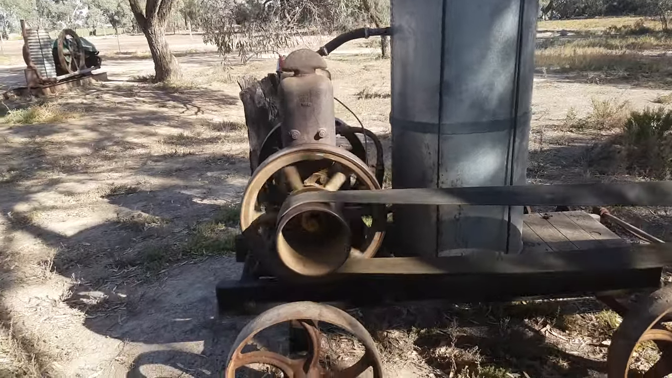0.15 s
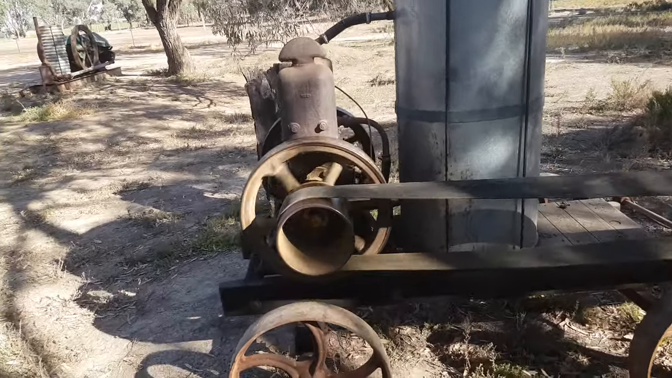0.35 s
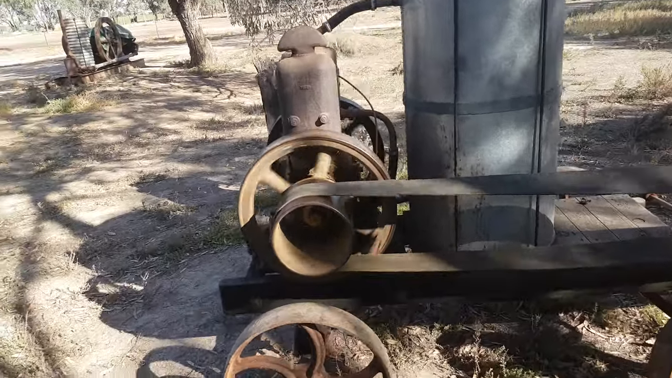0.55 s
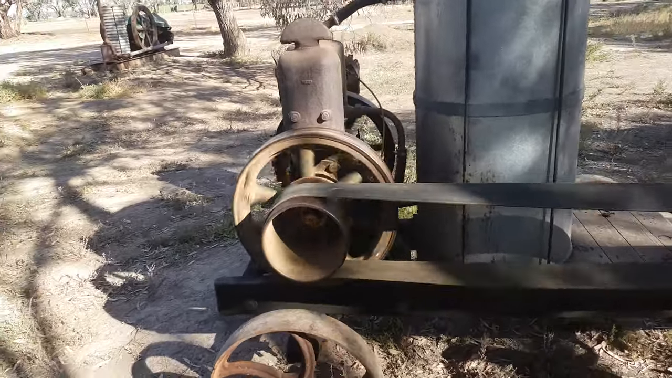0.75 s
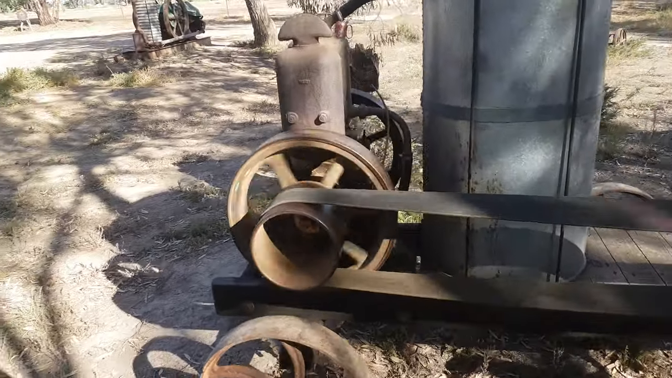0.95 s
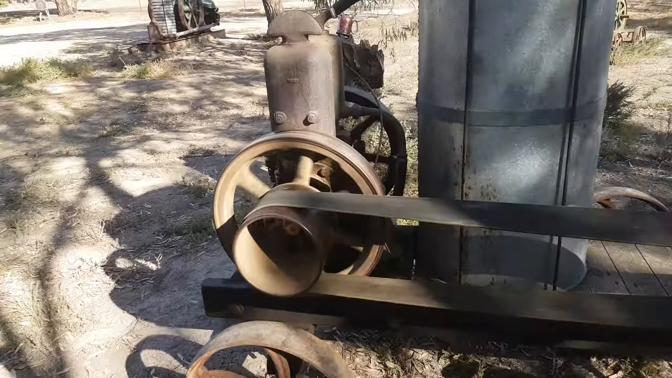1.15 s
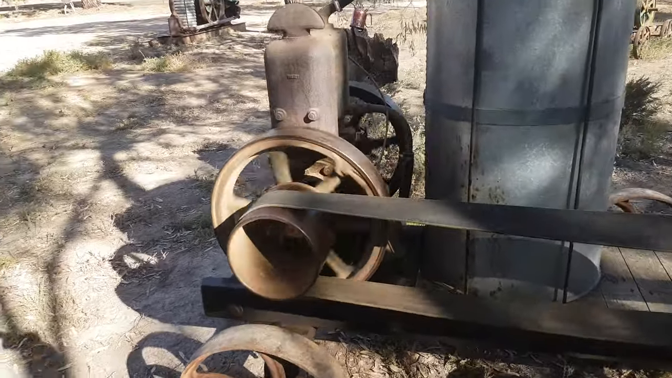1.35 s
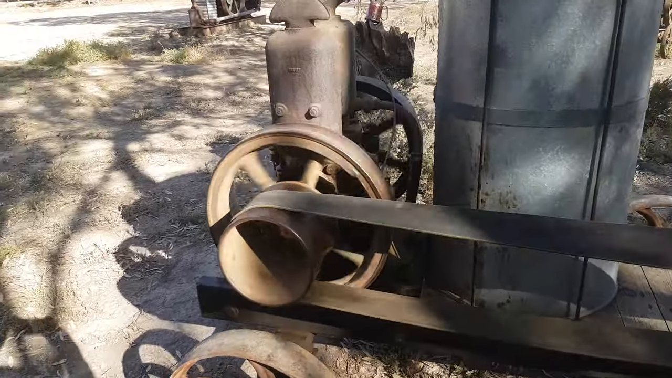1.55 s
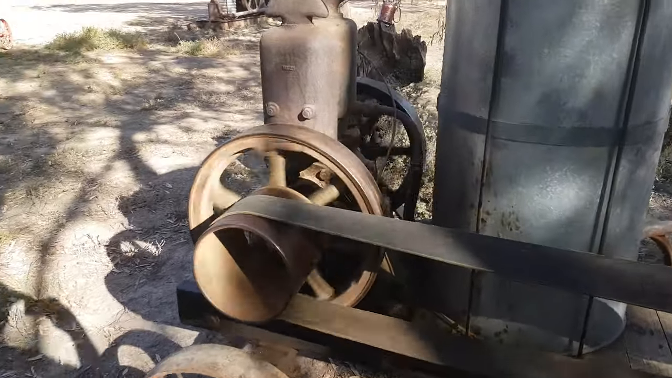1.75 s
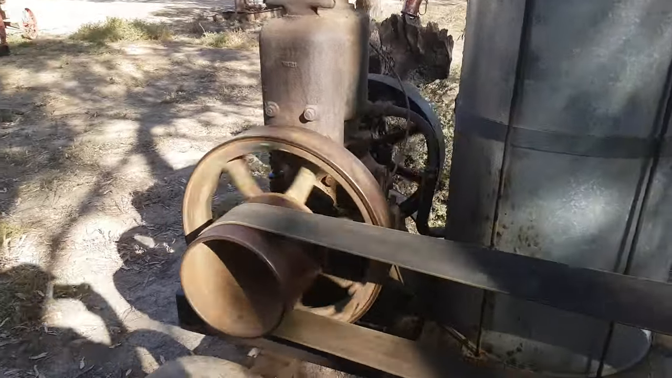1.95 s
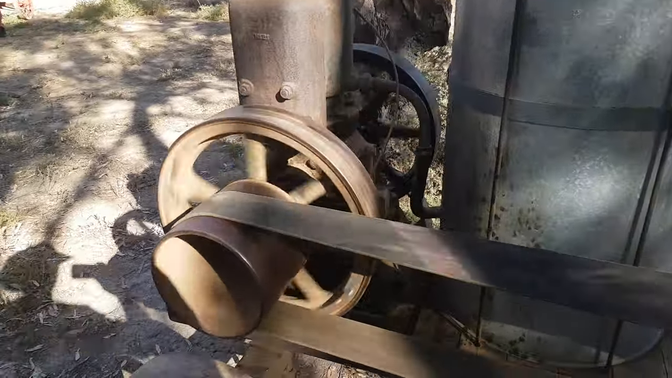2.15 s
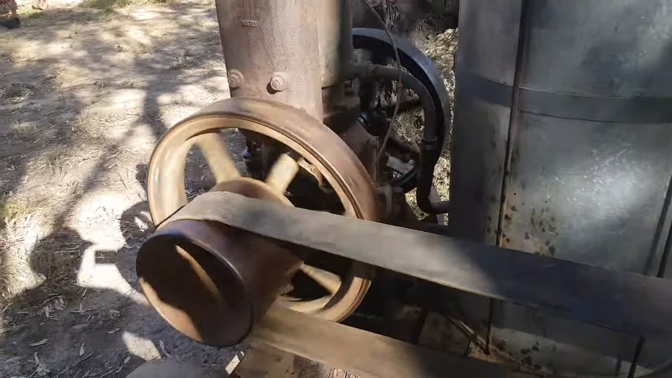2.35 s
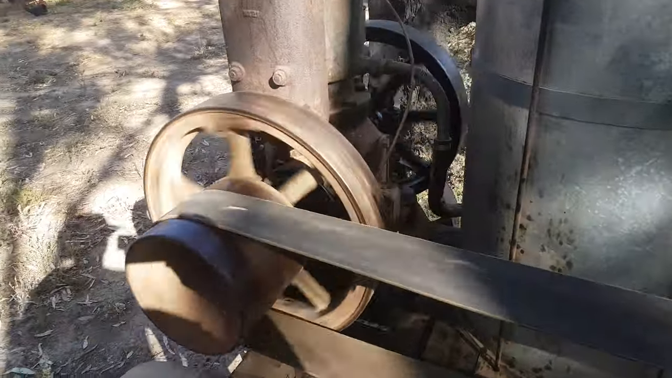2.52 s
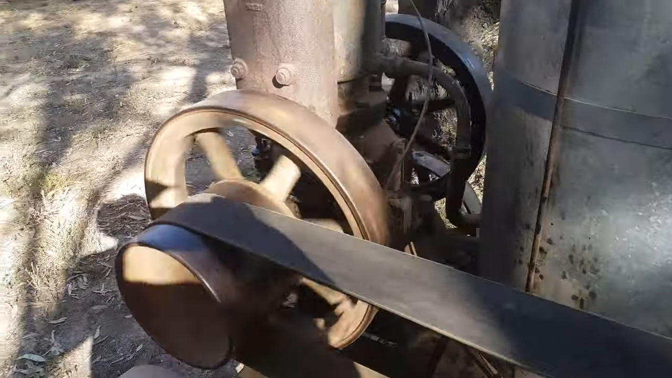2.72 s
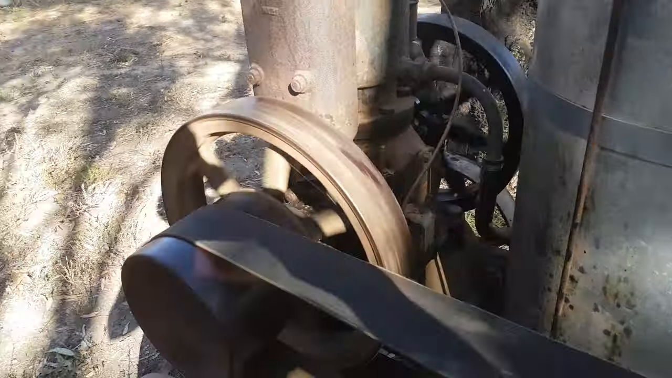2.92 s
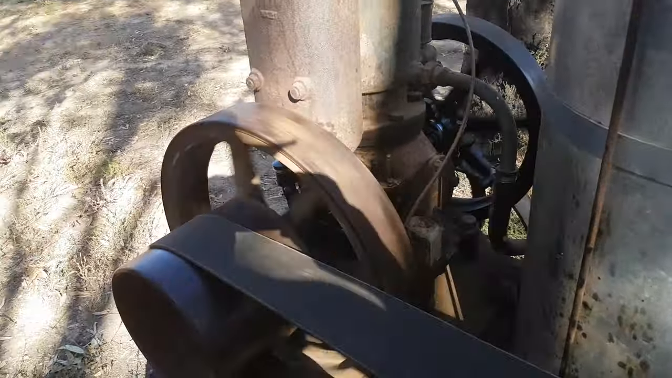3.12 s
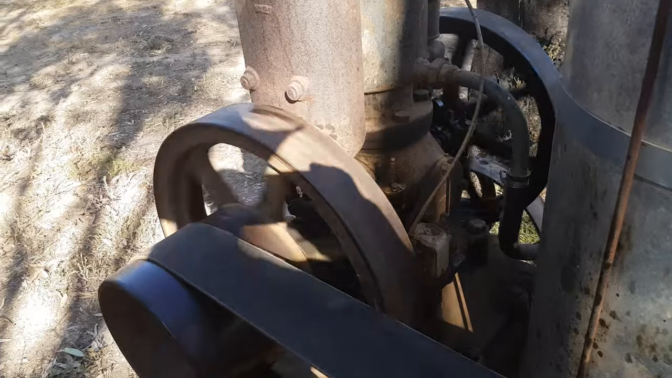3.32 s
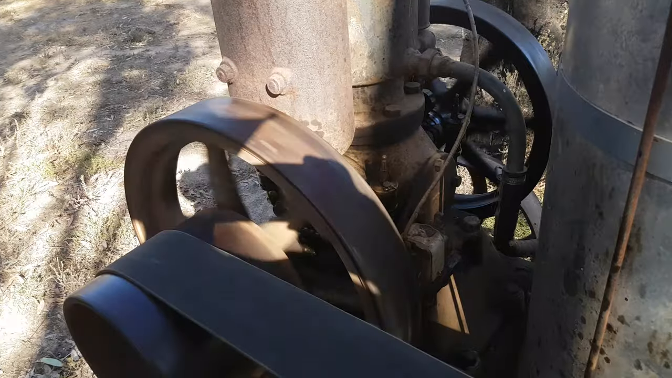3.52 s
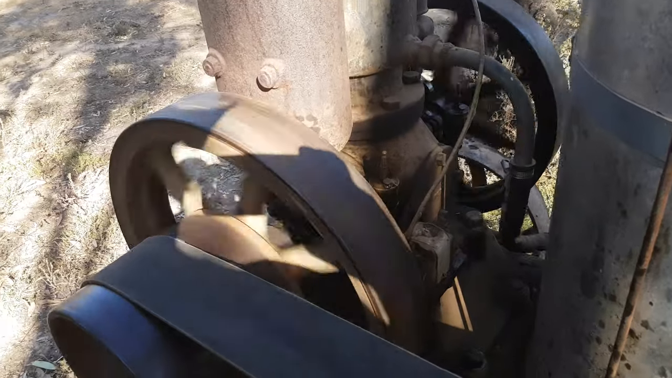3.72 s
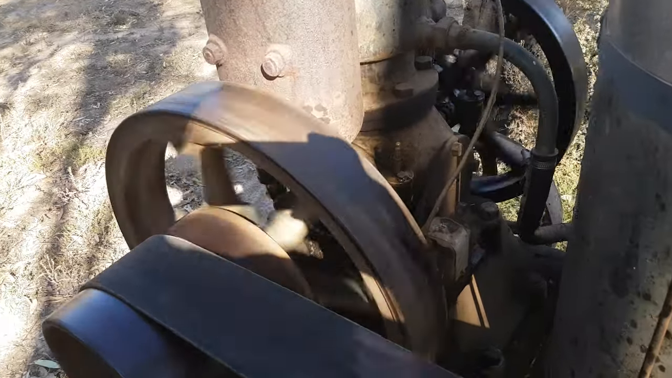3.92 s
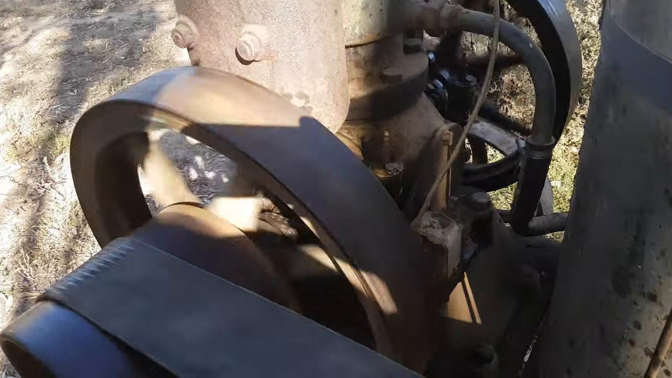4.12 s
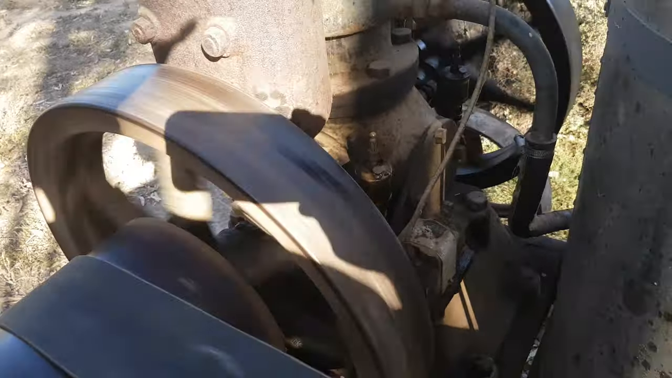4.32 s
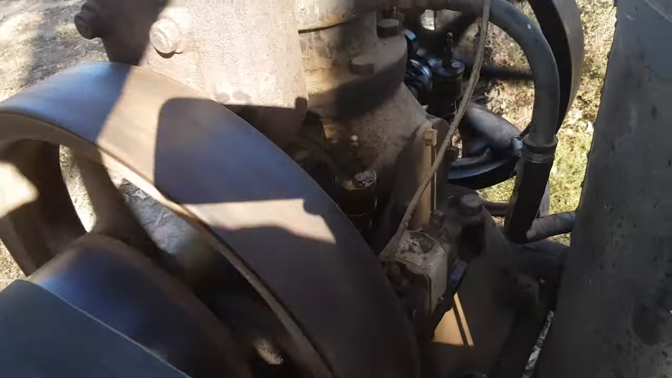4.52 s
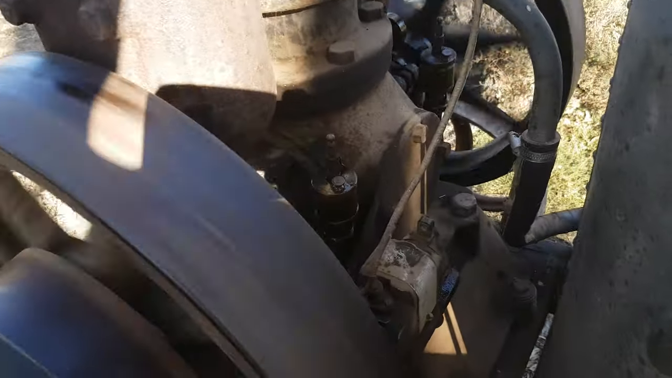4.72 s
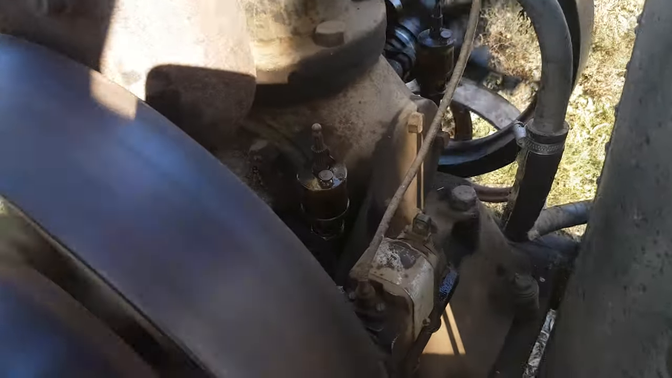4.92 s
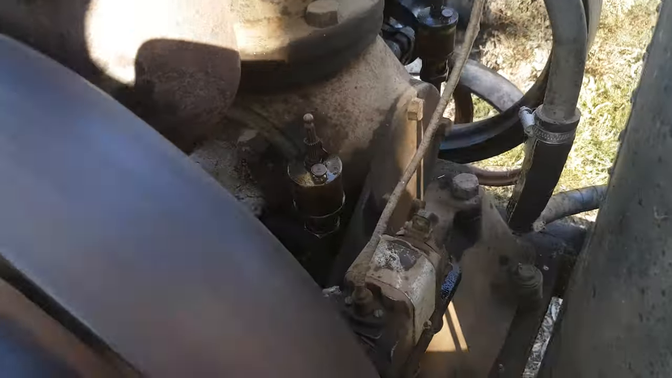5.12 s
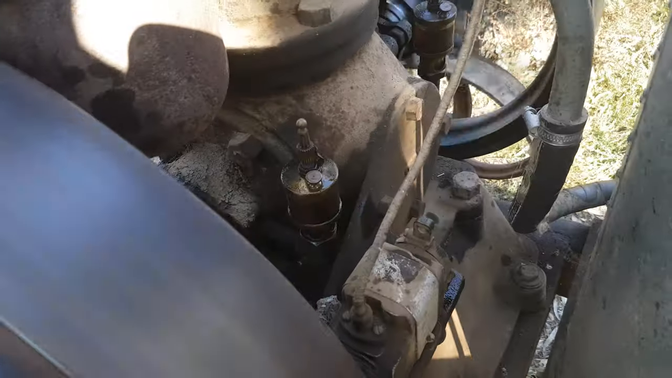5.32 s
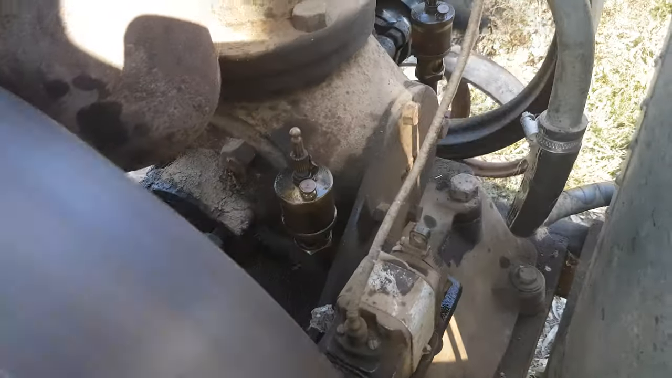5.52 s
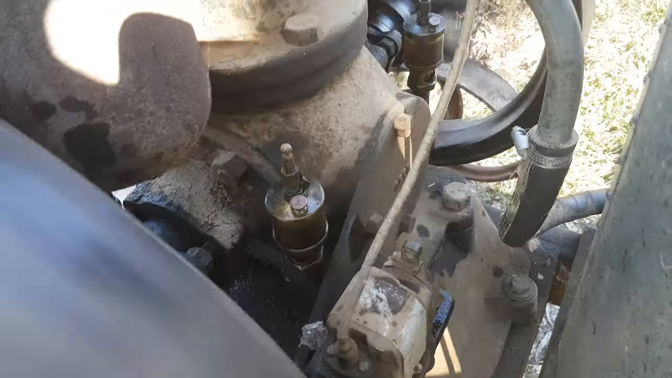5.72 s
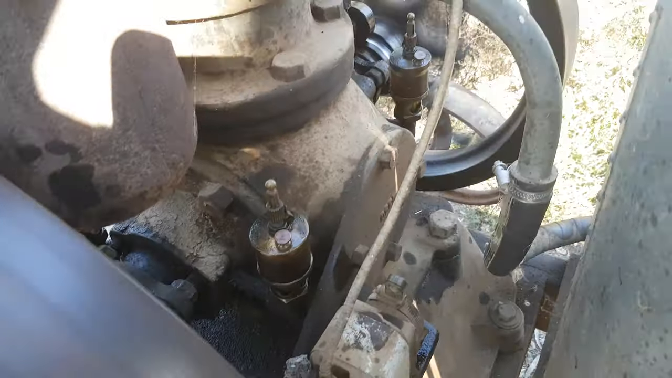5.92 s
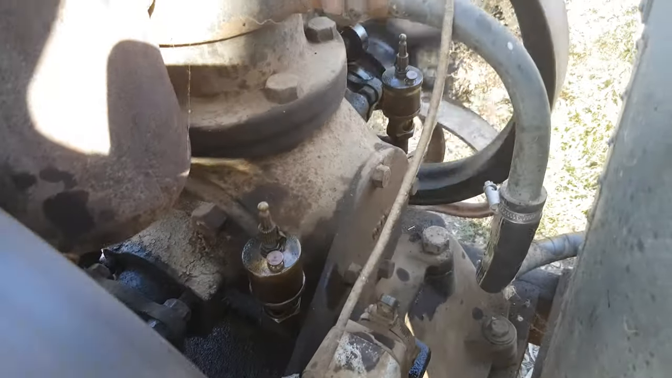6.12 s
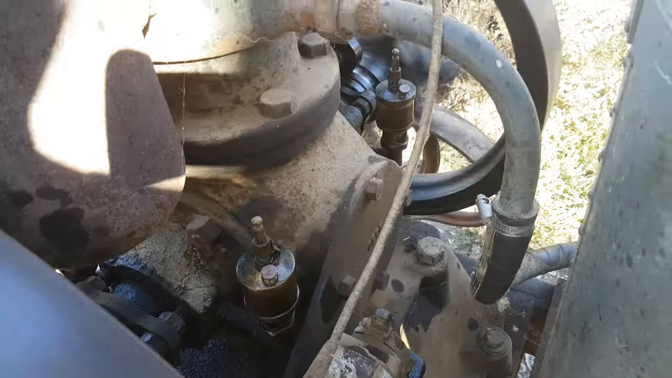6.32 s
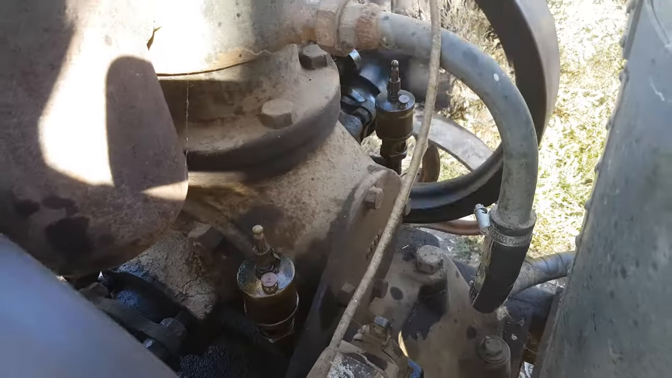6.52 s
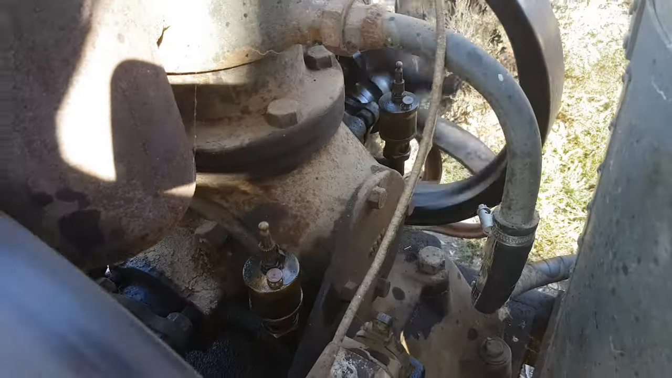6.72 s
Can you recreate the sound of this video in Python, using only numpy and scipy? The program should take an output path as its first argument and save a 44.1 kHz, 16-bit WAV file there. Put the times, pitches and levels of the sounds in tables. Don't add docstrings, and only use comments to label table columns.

```python
import sys
import numpy as np
from scipy import signal
from scipy.fft import rfft, irfft, next_fast_len
from scipy.io import wavfile
from scipy.ndimage import uniform_filter1d

SR = 44100
rng = np.random.default_rng(int(sys.argv[2]) if len(sys.argv) > 2 else 0)


def output_pcm(signal):
    pcm = np.clip(np.atleast_2d(signal).T, -1, 1) * 32767
    wavfile.write(sys.argv[1], SR, np.round(pcm).astype(np.int16))


def undo_db(level):
    steps = np.asarray(level, float) / 20
    return 10 ** steps


N = 298116
SIZE = next_fast_len(N + SR // 2)
HZ = np.arange(1, SIZE // 2 + 2) * SR / SIZE
CLOSENESS, LEFT_LEAD, VALVE_DB, RUNNING_DB = 1, 2, 3, 4

# time in seconds, level in dB.
CATCHES = [
    (2.325, -20.5),
    (4.1071, -22.5),
    (6.518, -21),
]


def along(column, seconds=np.arange(N) / SR):
    # time in seconds, closeness from 0 to 1, lead of the left port in samples,
    # valve gear level in dB, running gear level in dB.
    walk = [(0, 0, 0.88, -16.5, 0.5), (.5, 0, 1.8, -8, 0.3), (1.2, 0.12, 2.34, -5, 1),
            (1.9, 0.21, 2.6, -4.1, 4), (2.4, 0.43, 2.7, -1, 3.5), (2.9, 0.49, 3.05, -1.5, 5.5),
            (3.3, 0.59, 2.9, 1.5, 6), (3.7, 0.7, 3.8, -0.1, 5.5), (4.4, 0.93, 5.23, -2.5, -0.5),
            (5.0, 0.95, 11.9, -0.1, 4.5), (5.8, 0.97, 12.8, -0.7, 1.6), (6.3, 0.98, 14.4, -2, 0.3),
            (6.76, 0.93, 13.8, -1, 1.5)]
    return np.interp(seconds, np.array(walk)[:, 0], np.array(walk)[:, column])


def turns():
    # time in seconds, turns made.
    flywheel = [(.0676, 0), (.5889, 4), (1.1019, 8), (1.7384, 13), (2.2426, 17), (2.3701, 18), (2.7579, 21),
                (3.2681, 25), (3.6475, 28), (4.0251, 31), (4.1528, 32), (4.5396, 35), (4.7956, 37),
                (5.4314, 42), (5.8101, 45), (6.4365, 50), (6.6901, 52)]
    # closeness from 0 to 1, then levels in dB of
    heard_parts = [(0, -12.5, -14, -10.5, -21, -34), (.12, -12.5, -11, -13, -15.5, -36),
                   (.3, -10, -15, -7.5, -27, -34), (.46, -9, -16, -10, -11.5, -27),
                   (.52, -9.5, -13, -14, -18, -30.5), (.6, -6.5, -13, -10.5, -19, -31.5),
                   (.72, -3, -18.5, -11.5, -39.5, -27), (.9, -3.5, -18, -16.5, -22, -33.5),
                   (1, -4, -25, -29.5, -45, -27)]
    catching_db = [-0.4, .4, -11.5, 9.5, 8]
    missed_db = [-1.2, -11.5, -10, -5, -2]
    rich_db = [-1, 2, -1, 0.5, 1.5]
    # time in seconds, change in dB.
    odd_rings = [(.07, -13.5), (.2, -8.5), (.33, 2), (.46, -5), (.97, -8), (1.23, 6.5), (1.48, -13),
                 (3.27, 5.5), (3.4, -9), (4.67, 2.5), (4.92, -15), (5.3, 10), (5.94, 10), (6.19, -8),
                 (6.31, 12)]
    # time in seconds, change in dB.
    odd_rods = [(.33, -1.5), (.46, 5.5), (.72, 4), (1.1, 2), (1.23, -7), (1.48, -7), (2.76, -1), (2.89, 4),
                (3.01, 5), (3.14, -4.5), (3.77, 18), (3.9, 5), (4.67, 6), (5.05, 3), (5.43, 4), (5.56, -3)]

    when, made = np.transpose(flywheel)
    s = np.interp(np.arange(made[-1] + 1), made, when)
    s = np.r_[2 * s[0] - s[1], s]
    near = along(CLOSENESS, s)
    law = np.transpose(heard_parts)
    db = np.array([np.interp(near, law[0], column) for column in law[1:]])
    missed = np.searchsorted(s, np.transpose(CATCHES)[0])
    for step, change_db in enumerate((catching_db, missed_db, rich_db)):
        db[:, missed + step - 1] += np.array(change_db)[:, None]
    for row, odd in ((2, odd_rings), (3, odd_rods)):
        for at, change_db in odd:
            db[row, np.abs(s - at).argmin()] += change_db
    return s, db


def spikes(seconds, height):
    out = np.zeros(N)
    at = np.round(seconds * SR).astype(int)
    inside = (at >= 0) & (at < N)
    out[at[inside]] = height[inside]
    return out


def strikes(seconds, db, scatter_db, jitter_ms=.4):
    late, strong = np.clip(rng.standard_normal((len(seconds), 2)).T, -1.6, 1.6)
    return spikes(seconds + jitter_ms * late / 1000, undo_db(db + scatter_db * strong))


def blows(seconds, db, rise_ms, fall_ms, scatter_db):
    ms = np.arange(SR // 8) * 1000 / SR
    shape = (1 - np.exp(-ms / rise_ms)) * np.exp(-ms / fall_ms)
    return signal.oaconvolve(strikes(seconds, db, scatter_db), shape / shape.max())[:N]


def part(push, modes, far_pan_db, close_pan_db, alike, strike=0, order=1):
    noise = rng.standard_normal((2, N)) * push
    mid, side = rfft(noise + np.array([[1], [0]]) * strike, SIZE)
    apart = (1 - alike) * np.clip(HZ / 1500, 0, 1) / 2
    wave = np.sqrt(1 - apart) * mid + np.sqrt(apart) * side * np.array([[1], [-1]])
    far, close = 0, 0
    for k, (hz, width, far_db, close_db) in enumerate(modes):
        detuning = (HZ / hz - hz / HZ) * (hz / width)
        ring = (-1) ** k * np.sqrt(SR / np.pi / width) / (1 + 1j * detuning) ** order
        far = far + undo_db(far_db) * ring
        close = close + undo_db(close_db) * ring
    half = np.array([[.5], [-.5]])
    return np.array([wave * far * undo_db(far_pan_db * half), wave * close * undo_db(close_pan_db * half)])


def running_gear(s):
    # centre in Hz, width in Hz, level far in
    # dB, level close in dB.
    running_modes = [(70, 30, -57, -46), (150, 60, -49, -47), (300, 100, -43, -45),
                     (410, 163, -46.5, -41.5), (670, 480, -48, -50), (1285, 145, -46, -48.5),
              (1670, 230, -47, -49.5), (1930, 480, -46.5, -49.5), (3070, 1360, -48.5, -48.5),
              (3800, 800, -48.5, -50), (5400, 1150, -51.5, -54.5), (10900, 2600, -49.5, -56.5),
              (13300, 9000, -53, -70)]
    grain_db = 3 * np.clip(rng.exponential(size=N // 64 + 1), 0, 3) - 4
    grit = uniform_filter1d(undo_db(np.repeat(grain_db, 64)[:N]), size=90)
    swell = 1.79 + blows(s - .005, -0.32, rise_ms=0.82, fall_ms=10.4, scatter_db=2.5)
    return part(undo_db(along(RUNNING_DB)) * grit * swell, running_modes, 0.015, -0.058, alike=0.3)


def loose_parts(s, count=7):
    after = rng.uniform(0, 0.072, (len(s), count))
    at = (s[:, None] + after).ravel()
    db = along(VALVE_DB, at) - 60 * after.ravel()
    return strikes(at, db - 6.0, scatter_db=2.5) * rng.choice([-1, 1], N)


def valve_gear(s):
    # time after the thump in ms, level in dB.
    tap_times = [
        (35.5, 1.5),
        (47, -4.5),
        (60, -7),
    ]
    # centre in Hz, width in Hz, level far in dB, level close in dB.
    squeak_modes = [(3870, 630, -22, -25.5), (5900, 2200, -32, -47), (10500, 1900, -37, -41)]
    # centre in Hz, width in Hz, level far in dB, level close in dB.
    knock_modes = [(1345, 140, -19, -39), (2530, 1660, -21.5, -35), (4150, 700, -26.5, -34.5),
                   (5230, 500, -33, -59), (11500, 4000, -69, -47), (820, 630, -22.5, -49)]
    # centre in Hz, width in Hz, level far in dB, level close in dB.
    tappet_modes = [(3540, 1140, -20, -23.5), (5700, 1460, -24.5, -30), (1530, 580, -17.5, -27.5),
                    (2460, 2800, -21, -24), (10770, 2600, -27.5, -30), (870, 900, -25.5, -59.5)]
    # centre in Hz, width in Hz, level far in dB, level close in dB.
    iron_modes = [(956, 127, -28.5, -24.5), (1650, 46, -63, -29.5), (1968, 83, -28, -29),
                  (3154, 38, -42, -52), (3767, 180, -21.5, -27), (4753, 52, -21, -35),
                  (5470, 140, -23, -36), (6090, 370, -53, -33.5), (361, 120, -17.5, -30),
                  (384, 115, -32, -28.5)]

    db = along(VALVE_DB, s)
    early = s - np.interp(s, [.5, 3.7], [.0188, .016])
    rub = blows(early, db / 2, rise_ms=.4, fall_ms=5.5, scatter_db=.8)
    chirp = strikes(early + 0.00087, db, scatter_db=2.5)
    squeak = part(rub, squeak_modes, -2.0, -10.5, alike=0.21, strike=chirp, order=2)

    knock = blows(s + 0.0098, db, rise_ms=6.1, fall_ms=6.66, scatter_db=2.5)
    taps, ticks = 0, 0
    for ms, tap_db in tap_times:
        at = s + ms / 1000
        taps = taps + blows(at, db + tap_db, rise_ms=1.0, fall_ms=5.6, scatter_db=0.3)
        ticks = ticks + strikes(at + 0.00094, db + tap_db + 8.0, scatter_db=0)
    blow = strikes(s + .013, db + 12, scatter_db=2.5)
    blow = blow + strikes(s - .003, db + 20.5, scatter_db=0)
    blow = blow + strikes(s + 0.011, db - 18, scatter_db=0, jitter_ms=1.6)
    shock = blow + loose_parts(s)
    iron = part(0.55 * knock + 0.24 * taps, iron_modes, 0.3, -2.2, alike=0.09, strike=shock)
    clatter = part(knock, knock_modes, -0.58, -15.5, alike=1.0)
    clatter = clatter + part(taps, tappet_modes, -0.19, -1.8, alike=0.1, strike=ticks)
    return squeak + iron + clatter


def tank(s):
    # centre in Hz, width in Hz, level far in dB, level close in dB.
    tank_modes = [(743.5, 12.5, 5.5, -4.5), (667, 14, -21, -28)]
    # start in seconds, end in seconds, level in dB.
    hum_spells = [(-.1, .26, -34.5), (.4, .78, -41), (.8, 1.55, -33), (1.57, 1.92, -38),
                  (1.94, 2.42, -29.5), (2.7, 3.07, -33), (4.6, 4.98, -30.5), (5.0, 5.5, -34),
                  (6.0, 6.12, -24.5), (6.14, 6.37, -33.5), (6.39, 6.76, -26)]
    db = np.full(len(s), -49.0)
    for start, end, hum_db in hum_spells:
        db[(s > start) & (s < end)] = hum_db
    firing = blows(s - .006, db, rise_ms=2.8, fall_ms=12.0, scatter_db=0)
    latch = blows(s + 0.0785, db - 9, rise_ms=2.2, fall_ms=13.0, scatter_db=2.5)
    hit = strikes(s + 0.0067, db + 14.5, scatter_db=0)
    return part(firing + latch, tank_modes, -0.5, -12.5, alike=0.62, strike=hit)


def governor(s, rod_db, latch_db):
    # centre in Hz, width in Hz, level far in dB, level close in dB.
    latch_modes = [(1930, 760, 8.5, 7.5), (2106, 170, 3, 8), (1150, 220, 2, -6), (685, 88, 12.5, -0.5),
                   (3640, 570, -7, -54.5), (5800, 2000, -55, -14), (440, 160, 1, -1.5),
                   (11100, 1300, -35, -44)]
    # centre in Hz, width in Hz, level far in dB, level close in dB.
    rod_modes = [(1153.3, 79, -1.5, 0), (1269, 69, -7, -16)]
    # centre in Hz, width in Hz, level far in dB, level close in dB.
    linkage_modes = [(1850, 220, -8, 10), (2170, 28, -9, 1), (1186, 17, -12, -19), (680, 51, 21, -16),
                     (1840, 80, -4, -18), (2800, 24, 3, -5), (3270, 82, -10, -2), (3960, 990, -5, 5),
                     (5630, 500, -22, -27), (465, 65, -11, 2), (11000, 3700, -37, -47)]

    clack = blows(s + .081, latch_db - 7.0, rise_ms=1.0, fall_ms=11.3, scatter_db=2.5)
    latch = part(clack, latch_modes, -0.4, -3.1, alike=0.37)

    drag = blows(s + 0.0861, rod_db - 8, rise_ms=2.0, fall_ms=6.5, scatter_db=0)
    hit = strikes(s + .082, rod_db + 22, scatter_db=0)
    hit = hit + strikes(s + .042, rod_db + 14, scatter_db=2)
    rod = part(drag, rod_modes, -.8, -1.5, alike=.9, strike=hit, order=3)

    at, db = np.transpose(CATCHES)
    rattle = blows(at, db - 3.5, rise_ms=0.11, fall_ms=3.5, scatter_db=0)
    snap = strikes(at + 0.00101, db + 6, scatter_db=0, jitter_ms=0)
    catch = part(rattle, linkage_modes, -.8, -4.1, alike=0.18, strike=snap)
    return latch + rod + catch


def frame(s, db):
    # centre in Hz, width in Hz, level far in dB, level close in dB.
    timber_modes = [(65.1, 20.5, -76, 1.5)]
    kick = strikes(s - .017, db + 11.5, scatter_db=2.5)
    return part(np.zeros(N), timber_modes, -.1, -.1, alike=1, strike=kick, order=2)


def thump(s, db):
    # time from the thump in ms, width in ms,
    # push on the case, push on the pipe (relative).
    gas_pushes = [
        (-7.59, .45, .77, -.4),
        (-5.73, .45, -.68, -.57),
        (.58, .85, -.37, 1.49),
        (7.31, .45, -.44, .18),
        (33.21, .95, -.14, .27),
        (37.05, 1.3, .74, -1.28),
    ]
    # frequency in Hz, 60 dB decay in seconds, levels far, midway and close in dB.
    case_modes = [(85.4, .064, -15, -19, -20), (111, .142, -8.6, -4, .2), (158, .04, -6.5, -14, -11)]
    # frequency in Hz, 60 dB decay in seconds, levels far, midway and close in dB.
    pipe_modes = [(308, .09, -50, 5.5, -4), (288, .08, 3.3, -50, -3), (370, .05, -9, -4, -14)]

    before = 441
    ms = np.arange(-before, 2205) * 1000 / SR
    t = np.arange(SR // 5) / SR
    near = along(CLOSENESS)
    out = 0
    for column, modes, scatter_db in ((2, case_modes, 0), (3, pipe_modes, 0.37)):
        turn = 0
        for p in gas_pushes:
            bell = np.exp(-.5 * ((ms - p[0]) / p[1]) ** 2) / p[1]
            turn = turn + p[column] * bell * 1000 / SR / np.sqrt(2 * np.pi)
        height = undo_db(db + scatter_db * rng.standard_normal(len(s)))
        push = signal.oaconvolve(spikes(s, height), turn)[before:N + before]
        for hz, t60, *gain_db in modes:
            decay = 1000. ** (-t / t60) * np.sin(2 * np.pi * hz * t)
            ring = signal.oaconvolve(push, decay)[:N]
            out = out + np.interp(near, [0, .5, 1], undo_db(np.array(gain_db))) * ring
    return np.array([out, out]) * undo_db(-1.35)


def exhaust(s, hiss_db, ring_db):
    # centre in Hz, width in Hz, level far in dB, level close in dB.
    hiss_modes = [(3140, 660, -10.5, -3.5), (4267, 110, -9.5, -4.5), (5340, 360, -4, -3.5),
                  (6350, 430, -3, -6), (6820, 470, -6.5, -10), (2020, 2000, -59, -11)]
    # centre in Hz, width in Hz, level far in dB, level close in dB.
    spit_modes = [(9900, 2200, -3, -3), (13300, 6100, -16, -5.5)]
    # centre in Hz, width in Hz, level far in dB, level close in dB.
    pipe_end_modes = [(1566, 78, 0.5, -1.5), (1413, 147, 0.5, -10), (664, 1200, -8, -9)]

    crack = blows(s - .0062, hiss_db, rise_ms=2.6, fall_ms=4.4, scatter_db=0)
    rush = blows(s - .002, hiss_db - 27.5, rise_ms=9.4, fall_ms=17.0, scatter_db=2.5)
    snap = strikes(s - .004, hiss_db - 7, scatter_db=2.5)
    gas = part(crack + rush, hiss_modes, 0.64, 4.1, alike=0.21, strike=snap)

    spit = blows(s - .0058, hiss_db, rise_ms=4.3, fall_ms=2.85, scatter_db=2.5)
    jet_top = part(spit + rush, spit_modes, 0.64, 4.2, alike=0.076)

    ring = blows(s - .0065, ring_db - 4.5, rise_ms=0.72, fall_ms=6.2, scatter_db=2.5)
    steps = strikes(s - .0055, ring_db + 11.5, scatter_db=2.5)
    steps = steps + strikes(s + 0.00047, ring_db - 7, scatter_db=2.5)
    pipe_end = part(ring, pipe_end_modes, -2.2, 1.5, alike=0.36, strike=steps, order=2)
    return gas + jet_top + pipe_end


def scene():
    s, (thump_db, hiss_db, ring_db, rod_db, latch_db) = turns()
    parts = running_gear(s) + valve_gear(s) + tank(s) + governor(s, rod_db, latch_db)
    parts = parts + frame(s, thump_db) + exhaust(s, hiss_db, ring_db)
    far, close = irfft(parts, SIZE)[..., :N]
    left, right = far + along(CLOSENESS) * (close - far)
    left = np.interp(np.arange(N) + along(LEFT_LEAD), np.arange(N), left)
    return thump(s, thump_db) + np.array([left, right])


def low_pass(x):
    return signal.sosfilt(signal.butter(12, 16980, fs=SR, output="sos"), x)


def record(dry):
    # frequency in Hz, left minus right in dB.
    port_balance = [(60, -2), (200, -3), (380, -4), (700, -2), (1290, -2.5), (4400, -1.2), (8120, 4),
                    (15000, -9)]
    dip_hz, dip_width_hz, dip_db = 8750, 1120, -9
    top_hz, bottom_hz = 16000, 32
    hz, left_over_right_db = np.transpose(port_balance)
    tilt_db = np.interp(np.log(HZ), np.log(hz), left_over_right_db) * np.array([[.5], [-.5]])
    notch_db = dip_db * np.exp(-((HZ - dip_hz) / dip_width_hz) ** 2)
    edges = 1 / (1 + (HZ / top_hz) ** 70) / np.sqrt(1 + (bottom_hz / HZ) ** 4)
    heard = irfft(rfft(dry, SIZE) * undo_db(tilt_db + notch_db) * edges, SIZE)[:, :N]
    return low_pass(np.clip(heard, -1, 1))


dry = scene()
out = record(dry)
output_pcm(out)
```